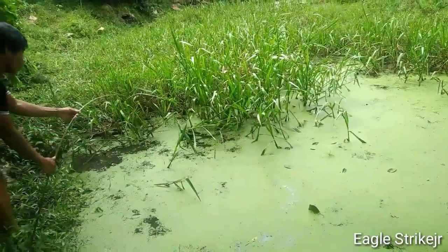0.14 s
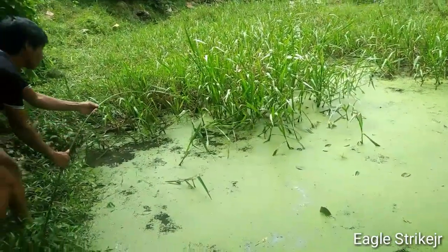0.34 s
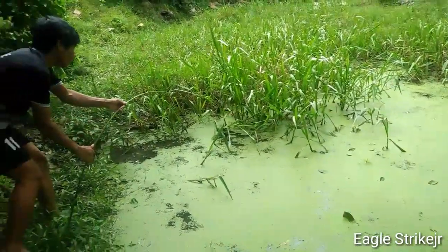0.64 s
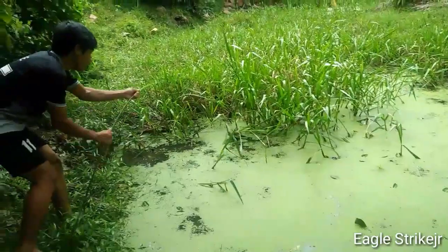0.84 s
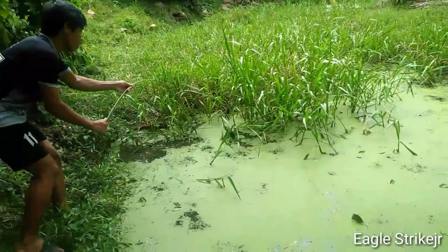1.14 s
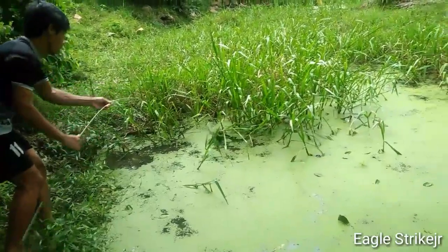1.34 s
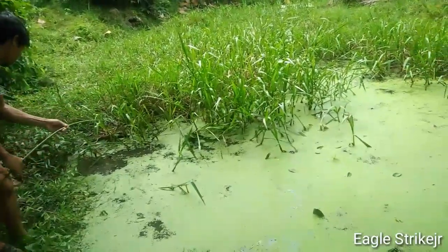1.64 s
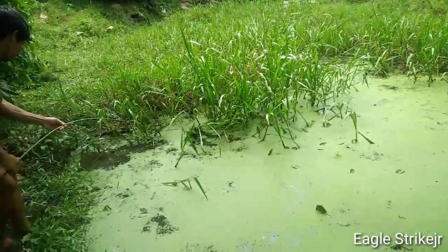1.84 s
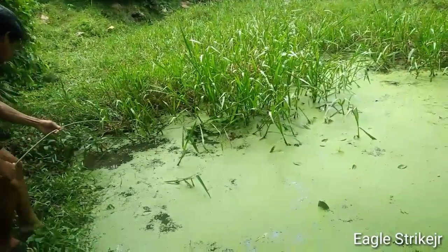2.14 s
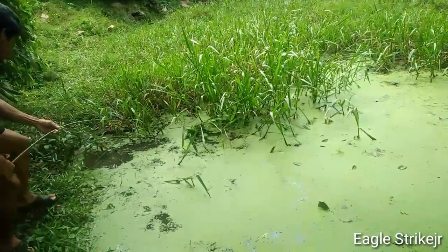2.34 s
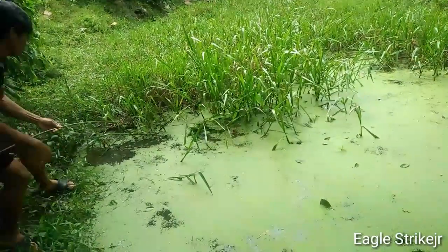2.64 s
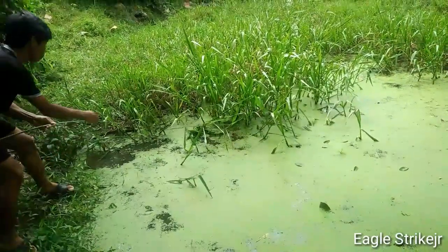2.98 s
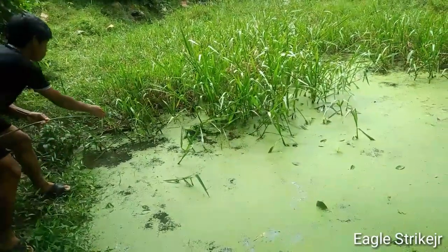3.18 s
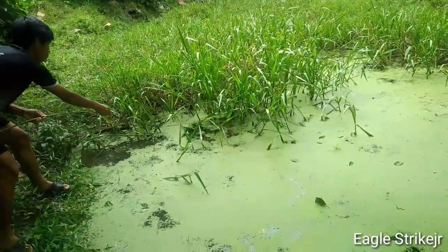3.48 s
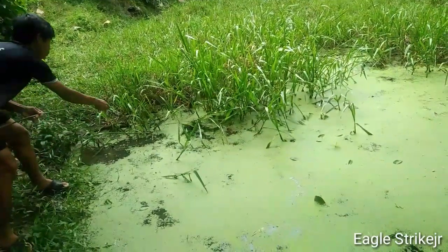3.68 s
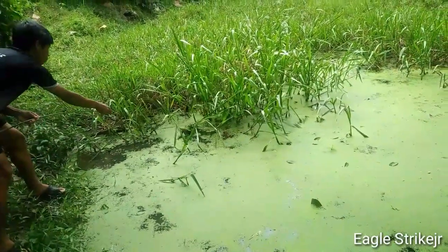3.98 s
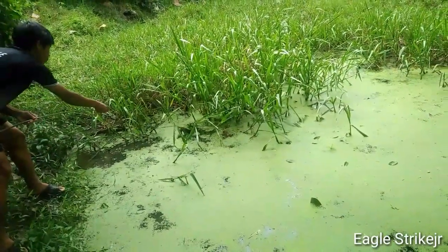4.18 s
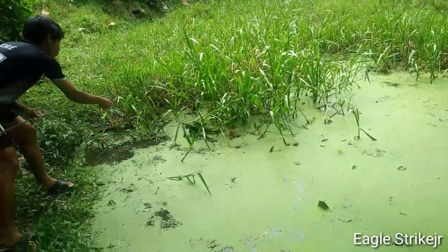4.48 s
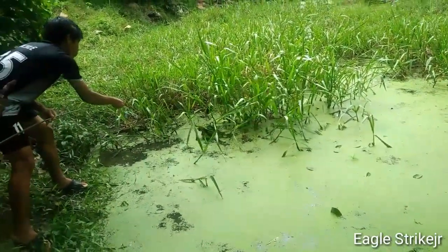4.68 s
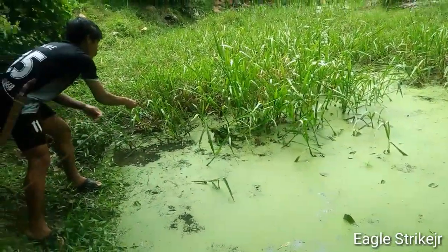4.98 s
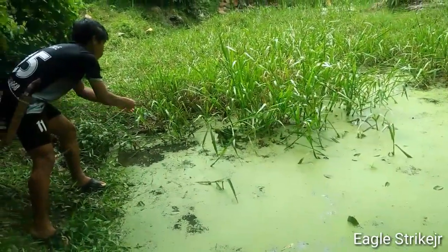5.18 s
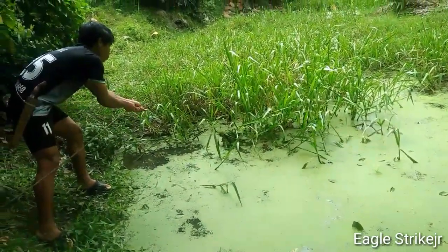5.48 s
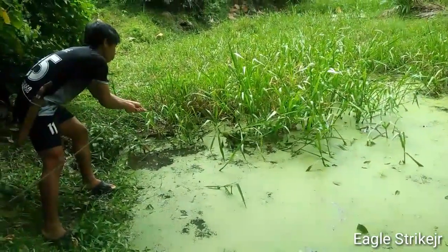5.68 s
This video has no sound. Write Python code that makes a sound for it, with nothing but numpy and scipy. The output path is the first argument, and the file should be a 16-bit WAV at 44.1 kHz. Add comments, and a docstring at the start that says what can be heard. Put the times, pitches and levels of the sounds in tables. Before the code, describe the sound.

Outdoors beside a weedy pond, cicadas drone shrilly and almost constantly, dipping sharply just after two seconds. A line hauled through grass makes uneven rustling strokes, busiest from one to three seconds and again after five. Stems snap woodily close to the microphone, with one small dull heel thump near 2.8 seconds. A cricket chirps regularly. Soft wind and a faint distant motor lie behind; the treble is wide, lower sounds are central.

```python
"""Cicadas drone in two high bands over a weedy pond edge on a hot day: random clicks in two resonances.
Grass rustles in strokes as a line is hauled through: clumped grains, hissing or ringing.
Stems snap close by (struck damped modes plus noisy cracks), and a heel thumps once on soft ground.
A cricket chirps in falling tones, fainter ones chirp at random, and soft narrow notes come from afar.
Behind lie smooth noise of leaves and wind and a far motor's blurred hum."""
import sys
import numpy as np
from scipy import signal
from scipy.fft import rfft, irfft, next_fast_len
from scipy.io import wavfile

SR = 44100
rng = np.random.default_rng(int(sys.argv[2]) if len(sys.argv) > 2 else 0)


def master_out(mix):
    """Clip the mix to full scale and print it as 16-bit PCM to the path in sys.argv[1]."""
    frames = np.transpose(np.atleast_2d(mix))
    ceiling = np.clip(frames, -1, 1)
    pcm = np.round(ceiling * 32767).astype(np.int16)
    wavfile.write(sys.argv[1], SR, pcm)


N = 256662


def from_db(db):
    """Amplitude factor of a level in dB."""
    return 10 ** (np.asarray(db) / 20)


def rms_one(x):
    """Scale each stream to an RMS of 1."""
    return x / np.sqrt(np.mean(x ** 2, axis=-1, keepdims=True) + 1e-20)


def in_time(rows):
    """Interpolate each column of a time table to every sample."""
    time_s, *columns = np.vstack(rows).T
    return [np.interp(np.arange(N) / SR, time_s, column) for column in columns]


def colour(x, spectrum, outside_db=-120):
    """Filter by a (frequency [Hz], gain [dB]) table, interpolated over log frequency."""
    size = next_fast_len(N)
    hz, db = np.transpose(spectrum)
    log_hz = np.log(np.arange(size // 2 + 1) * SR / size + 1)
    gain = from_db(np.interp(log_hz, np.log(hz), db, outside_db, outside_db))
    return irfft(rfft(x, size) * gain, size)[..., :N]


def bandpass(x, order, edges_hz):
    """Butterworth band-pass."""
    return signal.sosfilt(signal.butter(order, edges_hz, "band", fs=SR, output="sos"), x)


def drift(rate_hz):
    """Random modulation of RMS 1: low-passed noise, made at SR / 40 and interpolated."""
    pole = np.exp(-2 * np.pi * rate_hz * 40 / SR)
    noise = rng.standard_normal(N // 40 + 2002)
    slow = signal.lfilter([1], [1, -2 * pole, pole * pole], noise)[2000:]  # settled part
    return np.interp(np.arange(N) / 40, np.arange(len(slow)), rms_one(slow))


def decay(t60_s):
    """Per-sample factor that falls 60 dB in t60_s."""
    return from_db(-60 / (t60_s * SR))


def ring(clicks, hz, t60_s):
    """Two-pole resonator: a unit click starts a decaying sine of initial height 1."""
    r, w = decay(t60_s), 2 * np.pi * hz / SR
    return signal.lfilter([0, np.sin(w)], [1, -2 * r * np.cos(w), r * r], clicks + 1e-18)


def grains(per_s, spread_db):
    """Two unrelated streams of random clicks of uneven size and either sign."""
    sizes = from_db(spread_db * np.minimum(rng.exponential(1, (2, N)), 5))
    signs = rng.choice([-1, 1], (2, N))
    return sizes * signs * (rng.random((2, N)) < per_s / SR)


# chorus level before modulation: (time [s], lower band level [dB], upper band level [dB])
CHORUS_LEVELS = [(0, -46, -47.5), (.55, -46, -48.5), (.76, -50, -50.5), (.85, -47.5, -49), (1.02, -48, -49),
                 (1.3, -46, -46.5), (1.6, -46, -46), (1.9, -48.5, -47), (2.0, -48.5, -68),
                 (2.37, -61.5, -63.5), (2.44, -51, -59), (2.7, -47, -53), (3.03, -48.5, -54),
                 (3.1, -58.5, -66), (3.16, -49.5, -54.5), (3.74, -51.5, -57.5), (4.3, -48.5, -51.5),
                 (4.67, -48, -55.5), (5.07, -44.5, -52), (5.82, -47, -52)]
# two treble resonances, colouring both chorus and rustle: (frequency [Hz], relative gain [dB])
LOW_RESONANCE = [(3710, -51), (6300, -29), (6690, -34.5), (7040, -8.5), (7380, -0.5), (7580, 2), (7940, 1),
                 (8610, -18), (8900, -18), (11600, -35), (19600, -120)]
HIGH_RESONANCE = [(5060, -41.5), (8600, -7), (9410, 3.5), (9810, 4.5), (10100, -2.5), (10400, -8.5),
                  (10700, -11.5), (11500, -19.5), (15000, -35), (22000, -120)]


def cicadas():
    """Many tymbals click out of step, coloured by two treble resonances; both bands throb together."""
    low_db, high_db = in_time(CHORUS_LEVELS)
    throb_hz = 19.3 + 0.19 * drift(0.62)
    throb = np.sin(2 * np.pi * np.cumsum(throb_hz) / SR)
    shared_db = 1.1 * throb + 1.0 * drift(55.0) + 2.0 * drift(9.6)
    low = rms_one(colour(grains(9000, 1.22), LOW_RESONANCE))
    high = rms_one(colour(grains(9000, 3.1), HIGH_RESONANCE))
    return low * from_db(low_db + shared_db) + high * from_db(high_db + 0.76 * shared_db)


# crossfade from early to late rustle colour: (start [s], end [s])
EARLY_TO_LATE = (4.0, 4.6)


def grass():
    """Clumps of tiny contacts: stems ring low, blades and tips hiss higher; the colour changes later."""
    thick_db, thin_db, blade_db, tip_db = strokes()
    clumps = drift(30.)
    late_share = np.interp(np.arange(N) / SR, EARLY_TO_LATE, [0, 1])
    out = blades(blade_db, clumps, late_share) + leaf_tips(tip_db, clumps)
    out[0] += stems(thick_db, thin_db, clumps)
    out[0] += narrow_ringing(thin_db, late_share)
    return out


# strokes: (start [s], length [s], thin stem level at start [dB], thin stem level at end [dB],
#           thick stems re thin [dB], blades re thin [dB], leaf tips re thin [dB])
GRASS_STROKES = [(1.069, 0.061, -49.5, -56.5, -8, -6.5, 4), (1.249, 0.21, -54, -43.5, -6.5, -9, -4.5),
                 (1.679, .24, -50.5, -44.5, -3.5, -7.5, -3), (1.984, 0.25, -48, -64, -7, -5.5, -9.5),
                 (2.393, 0.18, -58.5, -55.5, 0.5, -11.5, -7), (2.69, 0.049, -64, -64, 9, -6, 4.5),
                 (2.802, 0.078, -54, -61.5, 3.5, -6.5, 3.5), (3.148, 0.05, -70, -66.5, 3, 3.5, 2),
                 (3.473, .01, -70, -77, 12, -2, 0), (3.794, 0.089, -60, -66.5, -1.5, -0.5, 0.5),
                 (4.92, 0.096, -68, -68, -2, -1, -3), (5.059, 0.15, -58.5, -51.5, -4.5, -6, -6),
                 (5.229, 0.01, -44.5, -41.5, -5.5, -6.5, -1), (5.3, 0.089, -52.5, -60.5, -3.5, -1.5, 0.5),
                 (5.406, 0.1, -59.5, -58, -4.5, -4, 3), (5.559, 0.075, -64, -59.5, -15, -3.5, 3.5),
                 (5.757, 0.077, -58, -52, -17, -5.5, -0.5)]
# light brushing between strokes: (time [s], stem level [dB], leaf tip level [dB])
LIGHT_BRUSHING = [(0, -71, -69), (.5, -72.5, -82), (.9, -69.5, -76), (1.1, -60, -61), (2.2, -70.5, -65.5),
                  (2.37, -69.5, -75), (2.6, -63.5, -58), (2.91, -63.5, -63), (3.12, -71, -73),
                  (3.9, -70.5, -69.5), (4.4, -70.5, -68), (4.8, -68, -64), (5.05, -66, -58),
                  (5.82, -64.5, -68)]
ATTACK_DB_PER_S, RELEASE_DB_PER_S = 704, 261
BRUSHED_BLADES_RE_STEMS_DB = -5.5


def strokes():
    """Levels of thick stems, thin stems, blades, tips: fast onset, swell or fade, slower release."""
    t = np.arange(N) / SR
    stems_db, tip_db = in_time(LIGHT_BRUSHING)
    power = from_db([stems_db, stems_db, stems_db + BRUSHED_BLADES_RE_STEMS_DB, tip_db]) ** 2
    for start_s, length_s, start_db, end_db, thick_db, blade_db, tips_db in GRASS_STROKES:
        end_s = start_s + length_s
        db = np.interp(t, [start_s, end_s], [start_db, end_db])
        db -= ATTACK_DB_PER_S * np.maximum(start_s - t, 0)
        db -= RELEASE_DB_PER_S * np.maximum(t - end_s, 0)
        part_gains = from_db([[thick_db], [0], [blade_db], [tips_db]])
        power = power + from_db(db) ** 2 * part_gains ** 2
    return 10 * np.log10(power)


# blade hiss, early and late rustle colour: (frequency [Hz], relative gain [dB])
EARLY_SPECTRUM = [(1350, -47), (2300, -1.5), (2620, -5), (3350, -5), (3960, -1.5), (4820, -10.5),
                  (6210, -13), (6590, -7), (6800, -12), (8840, -3), (15000, -120)]
LATE_SPECTRUM = [(1350, -47), (2300, -13), (2480, 11), (2610, 8.5), (3790, -4), (5000, 0.5), (5930, -2),
                 (6240, 3), (6800, -21.5), (8840, -47), (15000, -120)]


def blades(blade_db, clumps, late_share):
    """Dense scraping grains, crossfading from early to late colour."""
    scrapes = grains(3000, 2.2)
    hiss = (1 - late_share) * rms_one(colour(scrapes, EARLY_SPECTRUM))
    hiss += late_share * rms_one(colour(scrapes, LATE_SPECTRUM))
    return from_db(blade_db + 0.83 * clumps + 1.1 * drift(26.0)) * hiss


# leaf tip hiss: (frequency [Hz], relative gain [dB])
TIP_SPECTRUM = [(6200, -38), (10500, -6.5), (12100, -9.5), (13600, -18.5), (14200, -5.5), (14300, -28.5),
                (15000, -33)]
SHEEN_LOW_RE_TIPS_DB, SHEEN_HIGH_RE_TIPS_DB = 0.2, 4


def leaf_tips(tip_db, clumps):
    """Fine high grains, plus a sheen in the two treble resonances."""
    hiss = rms_one(colour(grains(6000, 1.6), TIP_SPECTRUM))
    out = from_db(tip_db + 1.0 * clumps + 2.0 * drift(30.)) * hiss
    sheens = (SHEEN_LOW_RE_TIPS_DB, LOW_RESONANCE), (SHEEN_HIGH_RE_TIPS_DB, HIGH_RESONANCE)
    for sheen_db, band in sheens:
        sheen = rms_one(colour(grains(6000, 0.96), band))
        out += from_db(tip_db + sheen_db + 0.59 * clumps) * sheen
    return out


# thick, then thin stems: (lowest mode [Hz], highest mode [Hz], contact rate [1/s], t60 [cycles])
STEM_SIZES = [(602, 2110, 1200, 7.4), (1148, 2665, 1500, 16.5)]
STEM_PATCH_DB = 3  # RMS drift of each pitch's contacts


def stems(thick_db, thin_db, clumps):
    """Contacts dealt at random to 12 resonators per group; each pitch comes and goes on its own."""
    out = np.zeros(N)
    for level_db, (low_hz, high_hz, per_s, cycles) in zip((thick_db, thin_db), STEM_SIZES):
        contacts = grains(per_s, 0.5)[0]
        dealt = rng.integers(0, 12, N)
        rings = np.zeros(N)
        for k, hz in enumerate(np.geomspace(low_hz, high_hz, num=12)):
            hits = contacts * (dealt == k) * from_db(STEM_PATCH_DB * drift(14.2))
            rings += ring(hits, hz, cycles / hz)
        rings = bandpass(rings, 3, [1.22 * low_hz, 0.85 * high_hz])
        out += from_db(level_db + 1.14 * clumps) * rms_one(rings)
    return out


RINGING_HZ, RINGING_T60_CYCLES, RINGING_RE_THIN_STEMS_DB = 1864, 19, -6.5


def narrow_ringing(thin_db, late_share):
    """Grains through two equal resonators in series: narrow ringing in the late rustle."""
    t60_s = RINGING_T60_CYCLES / RINGING_HZ
    once = ring(grains(1000, 3.0)[0], RINGING_HZ, t60_s)
    twice = ring(once, RINGING_HZ, t60_s)
    return late_share * from_db(thin_db + RINGING_RE_THIN_STEMS_DB) * rms_one(twice)


# snaps, each another stem: (time [s], low mode level [dB], low mode [Hz],
#                            high mode level [dB], high mode [Hz], crack level [dB])
STEM_SNAPS = [(0.45, -78, 816, -42.5, 1780, -68), (0.663, -68, 1110, -50.5, 1600, -60),
              (1.463, -37, 1260, -31, 1550, -58), (1.927, -48, 1030, -27.5, 1530, -45),
              (1.985, -57, 1080, -42, 1770, -43), (2.681, -36, 880, -25.5, 1385, -61),
              (2.806, -54, 795, -37.5, 2020, -44), (2.812, -34.5, 1260, -34.5, 1650, -67),
              (2.821, -34.5, 893, -40, 1580, -59), (2.879, -40, 1030, -39, 1580, -49),
              (3.147, -52, 960, -45.5, 1950, -38.5), (3.192, -50, 1030, -49.5, 1370, -60),
              (3.792, -32, 720, -31, 1890, -35.5), (4.36, -61, 1120, -61, 1840, -48)]
LOW_MODE_T60_S, HIGH_MODE_T60_S = 0.024, 0.017
CRACK_MID_RE_HIGH_DB = -12
CRACK_TAIL_DB, CRACK_TAIL_T60_S = -21, 0.21  # splinters


def snaps():
    """Three quick fractures ring two modes of each stem; each snap also starts a bright crack."""
    out, mid_starts, high_starts = np.zeros(N), np.zeros(N), np.zeros(N)
    length = round(.12 * SR)
    chance = rng.standard_normal((len(STEM_SNAPS), 4))
    for (time_s, low_db, low_hz, high_db, high_hz, crack_db), luck in zip(STEM_SNAPS, chance):
        at, clicks = round(time_s * SR), np.zeros(length)
        second = 60 + int(25 * abs(luck[0]))
        third = 150 + int(40 * abs(luck[1]))
        clicks[[0, second, third]] = 1, 0.84 * luck[2], 0.54 * luck[3]
        out[at:at + length] += from_db(low_db) * ring(clicks, low_hz, LOW_MODE_T60_S)
        out[at:at + length] += from_db(high_db) * ring(clicks, high_hz, HIGH_MODE_T60_S)
        mid_starts[at] = from_db(crack_db + CRACK_MID_RE_HIGH_DB)
        high_starts[at] = from_db(crack_db)
    out = bandpass(out, 3, [450, 3600])
    out += cracks(mid_starts, [2800, 6000], t60_s=.04)
    return out + cracks(high_starts, [6800, 14400], t60_s=.015)


def cracks(starts, edges_hz, t60_s):
    """Ragged band-passed grains under a fast decay and a weak, longer splinter tail."""
    band = rms_one(bandpass(grains(4700, 4.2)[0], 2, edges_hz))
    out = np.zeros(N)
    for db, fade_s in ((0, t60_s), (CRACK_TAIL_DB, CRACK_TAIL_T60_S)):
        out += from_db(db) * band * signal.lfilter([1], [1, -decay(fade_s)], starts)
    return out


# heel on soft ground: (time [s], level before high-pass [dB], frequency [Hz], t60 [s])
HEEL_THUMP = [(2.817, -22.5, 181, 0.0068)]


def heel():
    """One push rings a heavily damped low resonance, high-passed at 70 Hz."""
    out = np.zeros(N)
    high_pass = signal.butter(1, 70, "high", fs=SR, output="sos")
    for time_s, db, hz, t60_s in HEEL_THUMP:
        push = ring(np.arange(N) == round(time_s * SR), hz, t60_s)
        out += from_db(db) * signal.sosfilt(high_pass, push)
    return out


# cricket chirps: (time [s], level before shaping [dB])
CHIRPS = [(0.0784, -66), (0.3785, -64), (0.6883, -64), (0.9487, -59), (1.2266, -66), (1.7833, -56),
          (2.0567, -65), (2.3286, -69), (2.6329, -62), (2.9257, -60), (3.2284, -69), (3.5503, -67),
          (4.4204, -66), (4.6703, -61), (4.9786, -57.5), (5.2634, -55), (5.5368, -54), (5.8034, -59)]
CHIRP_HZ, CHIRP_RISE_HZ_PER_S = 6293, 70  # start pitch, creeping up through the song
CHIRP_S, CHIRP_FALL_HZ, CHIRP_ROUGH_DB = .028, 380, 4
SECOND_STROKE_DB, OTHERS_MIN_DB, FOLIAGE_DB = -7, -75, -25


def cricket():
    """Short falling chirps, each with a weaker, lower second stroke; others chirp faintly at random."""
    out, t = np.zeros(N), np.arange(round(CHIRP_S * SR)) / SR
    shape = np.sin(np.pi * np.sqrt(t / CHIRP_S)) * (1 - .5 * np.cos(2 * np.pi * 90 * t))
    first = [(s, db, CHIRP_HZ + CHIRP_RISE_HZ_PER_S * s) for s, db in CHIRPS]
    second = [(s + .045, db + SECOND_STROKE_DB, hz - 120) for s, db, hz in first]
    others = [(3.9 * when, OTHERS_MIN_DB + 7 * size, 6200 + 600 * pitch)
              for when, size, pitch in rng.random((60, 3))]
    for time_s, db, hz in [*first, *second, *others]:
        at = min(round(time_s * SR), N - 1)
        cycles = hz * t - CHIRP_FALL_HZ * t * t / CHIRP_S / 2
        chirp = from_db(db) * shape * np.sin(2 * np.pi * cycles)
        out[at:at + len(t)] += chirp[:N - at]
    out *= from_db(CHIRP_ROUGH_DB * drift(70.))
    return out + foliage(out)


def foliage(chirps):
    """Scattering off foliage: convolution with 0.08 s of decaying noise."""
    lag = np.arange(round(.08 * SR))
    scatter = rng.standard_normal(len(lag)) * from_db(-60 * lag / SR / .1)
    return from_db(FOLIAGE_DB) * signal.fftconvolve(chirps, scatter)[:N]


# far, soft calls: (time [s], level before shaping [dB], frequency [Hz], length [s])
SOFT_CALLS = [(0.009, -61, 1156, 0.044), (0.058, -68, 1150, 0.043), (0.113, -61, 1100, 0.031),
              (3.453, -67, 5400, .03), (3.63, -70, 4600, 0.15), (4.07, -68, 5400, .08),
              (4.22, -72, 5350, 0.14), (4.75, -63, 4620, 0.18)]


def far_calls():
    """Blurred narrow notes from across the water: resonated noise that swells, then stops."""
    out, t = np.zeros(N), np.arange(N) / SR
    for time_s, db, hz, length_s in SOFT_CALLS:
        shape = np.sin(np.pi * np.clip((t - time_s) / length_s, 0, 1) ** 2.5)
        note = rms_one(ring(rng.standard_normal(N), hz, 95.0 / hz))
        out += from_db(db) * shape * note
    return out


# leaves and wind: (frequency [Hz], relative gain [dB])
AIR_SPECTRUM = [(20, -11), (36, -2.5), (60, -8), (110, -6.5), (160, -13), (230, -12), (750, -11),
                (1550, -27.5), (3000, -19), (5400, -27), (6500, -22), (9000, -35.5), (12400, -36),
                (14200, -17), (14300, -27), (15000, -32)]
AIR_DB = -65  # RMS before drift


def air():
    """Distant leaves and wind as smooth coloured noise, drifting in level."""
    noise = rms_one(colour(rng.standard_normal((2, N)), AIR_SPECTRUM))
    return from_db(AIR_DB + 1.0 * drift(1.9)) * noise


# motor hum bands: (frequency [Hz], width setting [Hz], relative level [dB])
MOTOR_BANDS = [(47.94, 7.8, 0.5), (91.7, 37, 0), (160, 27, -3)]
# motor: (time [s], level [dB])
MOTOR_LEVELS = [(0.0, -79), (2.28, -81.5), (2.58, -71.5), (4.52, -75), (4.9, -68), (5.82, -81)]


def far_motor():
    """Noise through low resonators gives a blurred hum that rises and falls."""
    hum = np.zeros(N)
    for hz, width_hz, db in MOTOR_BANDS:
        hum += from_db(db) * rms_one(ring(rng.standard_normal(N), hz, 3.9 / width_hz))
    return from_db(in_time(MOTOR_LEVELS)[0]) * hum


# stereo width: (frequency [Hz], side gain [dB])
SIDE_GAIN = [(20, -45), (4000, -45), (4300, -7), (6800, -7), (7200, -18), (8200, -9), (9500, -7),
             (11500, -5), (15000, -4)]


def scene():
    """Diffuse layers give a mid and an unrelated side stream; the side is strong only in the treble."""
    mid, side = cicadas() + grass() + air()
    mid = mid + snaps() + heel() + cricket() + far_calls() + far_motor()
    side = colour(side, SIDE_GAIN, outside_db=-52)
    return np.array([mid + side, mid - side])


CUTOFF_HZ, OFFSET_FULL_SCALE = 14430, -.0011


def record(dry):
    """A steep low-pass cuts the top; a small constant offset is added."""
    low_pass = signal.ellip(12, .5, 70, CUTOFF_HZ, fs=SR, output="sos")
    return signal.sosfilt(low_pass, dry) + OFFSET_FULL_SCALE


dry = scene()
out = record(dry)
master_out(out)
```